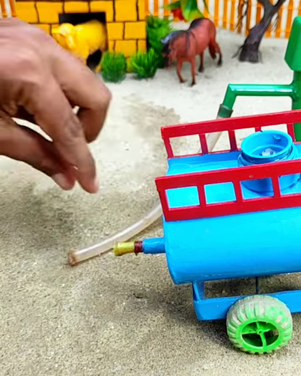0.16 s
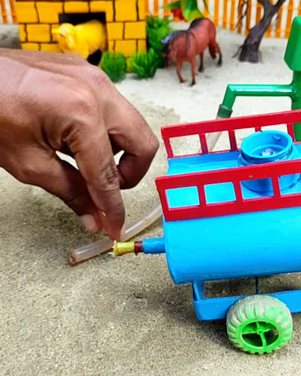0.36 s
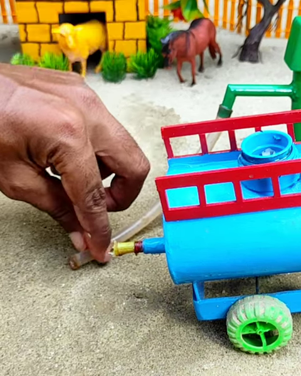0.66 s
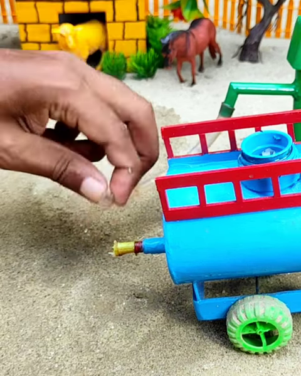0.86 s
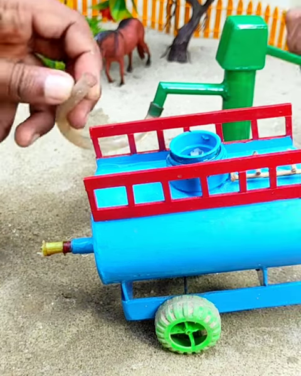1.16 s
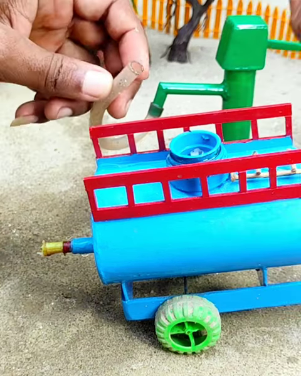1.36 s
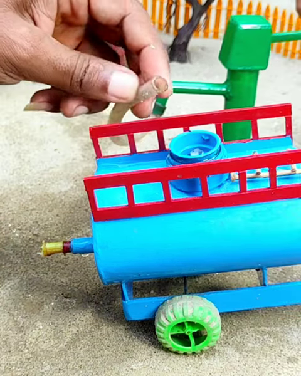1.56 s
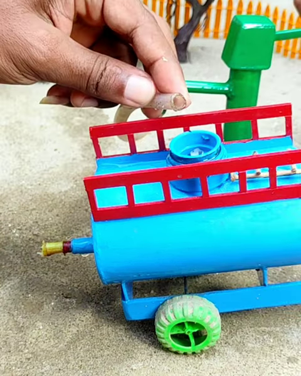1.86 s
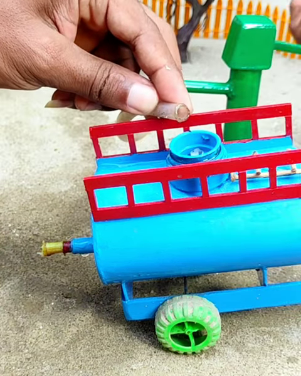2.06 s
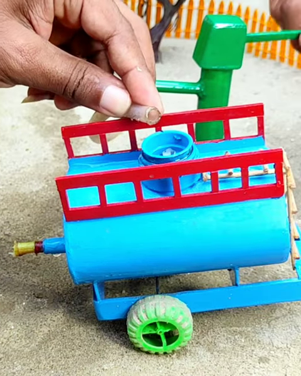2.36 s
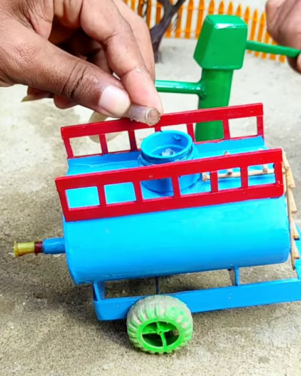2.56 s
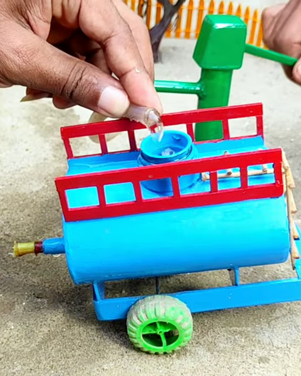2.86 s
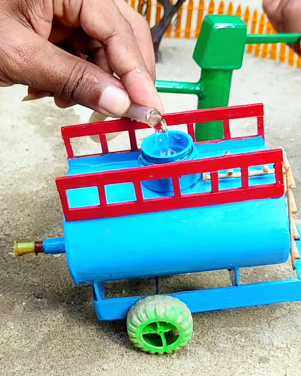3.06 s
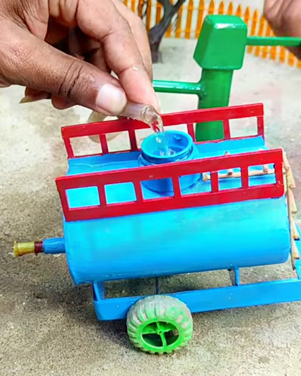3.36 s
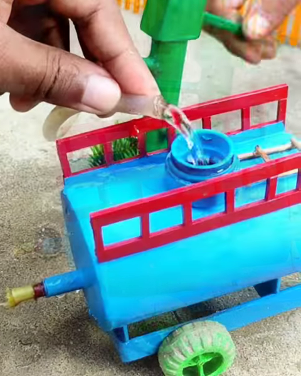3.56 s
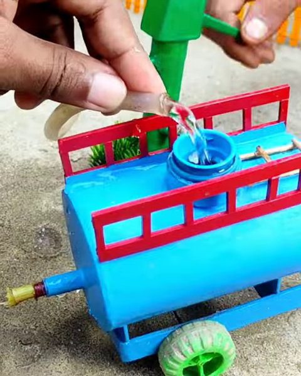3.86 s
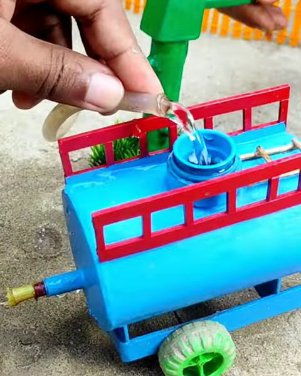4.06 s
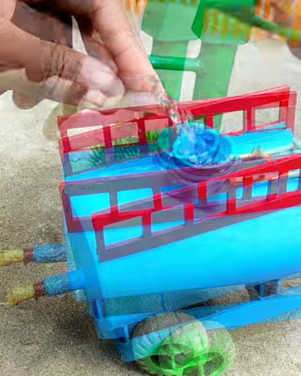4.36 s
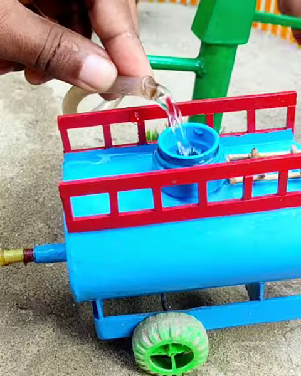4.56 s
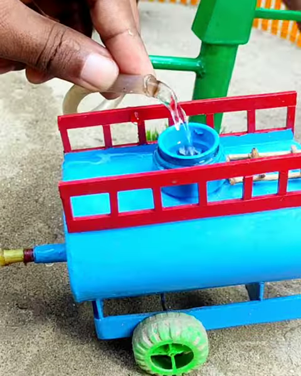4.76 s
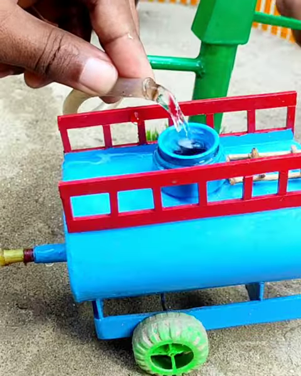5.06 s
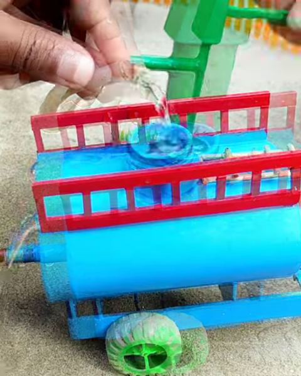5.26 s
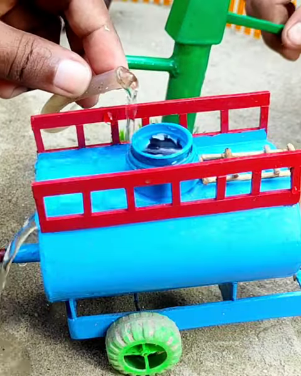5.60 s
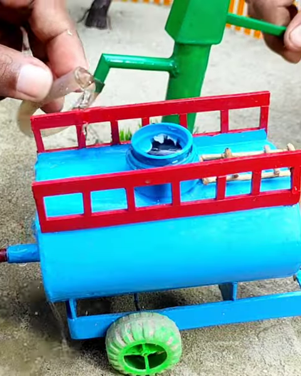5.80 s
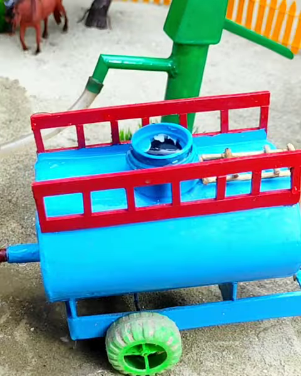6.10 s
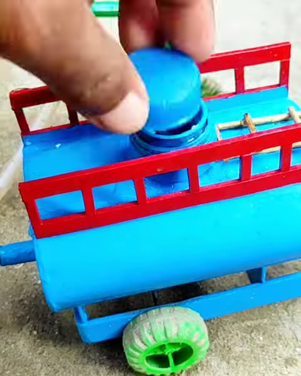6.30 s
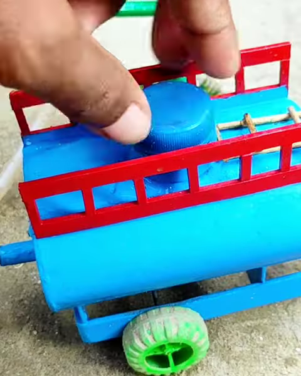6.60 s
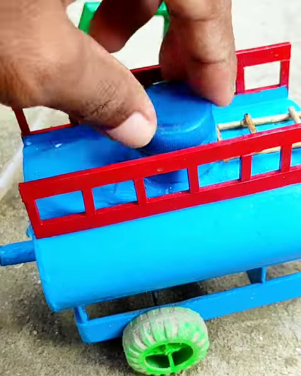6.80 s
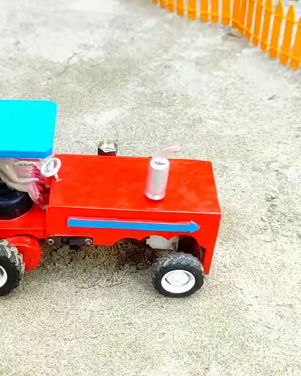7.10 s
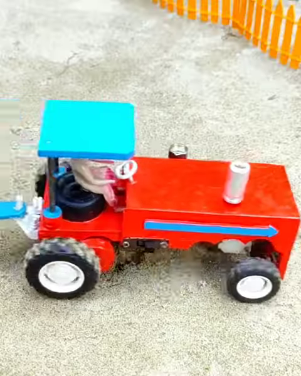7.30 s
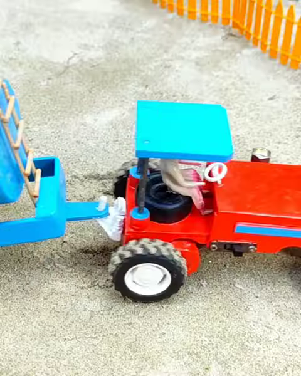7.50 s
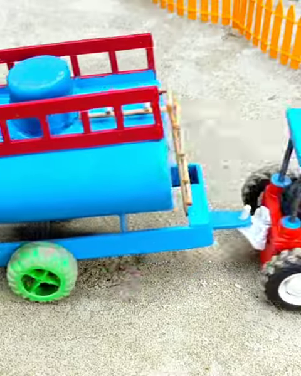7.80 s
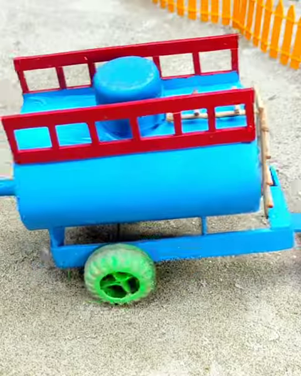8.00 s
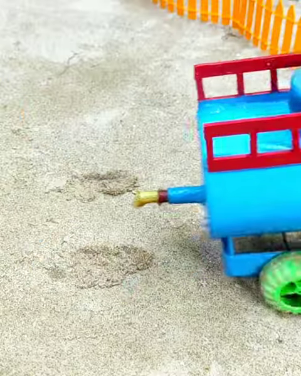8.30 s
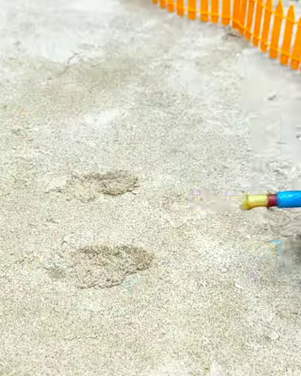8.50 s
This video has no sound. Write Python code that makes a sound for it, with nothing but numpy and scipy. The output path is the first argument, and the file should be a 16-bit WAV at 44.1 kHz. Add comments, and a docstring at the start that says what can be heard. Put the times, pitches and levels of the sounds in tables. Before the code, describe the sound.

Outdoors, close to the microphone, a small hand pump is worked with rasping double catches and a hollow, singing barrel. Then water runs into a plastic tank with bubbling, plops and ticking drops. The flow stops, a plastic cap scrapes and clicks onto its thread, and a tractor motor cuts in, throbbing and rattling to the end. Songbirds whistle from the trees over faint hiss.

```python
"""Outdoors among trees, a small hand pump is worked: the plunger rasps and its barrel resonances ring hollow.
Water then runs into a plastic tank, built from gliding bubble tones, drop ticks, spray noise and a low drumming.
A cap scrapes and clicks on its thread, then a tractor motor comes in: a harmonic throb under gated rattle.
Songbirds whistle throughout as gliding pure tones with diffuse echoes, over a faint outdoor hiss."""
import sys
import numpy as np
from scipy import signal
from scipy.fft import rfft, irfft
from scipy.io import wavfile
from scipy.ndimage import uniform_filter1d

SR = 44100
rng = np.random.default_rng(int(sys.argv[2]) if len(sys.argv) > 2 else 0)


def master(y):
    """Save y as 16-bit WAV."""
    cut = np.clip(np.atleast_2d(y).T, -1, 1)
    pcm = np.round(cut * 32767)  # scale
    wavfile.write(sys.argv[1], SR, pcm.astype(np.int16))


N = 381465
TIME = np.arange(N) / SR


def undb(db):
    """Decibels to gain."""
    return 10 ** (np.asarray(db) / 20)


def unit(x):
    """Scale to rms 1."""
    return x / np.sqrt(np.mean(x ** 2) + 1e-18)


def curve(table, axis=1):
    """One column of a table, joined by straight lines in time."""
    rows = np.array(table)
    return np.interp(TIME, rows[:, 0], rows[:, axis])


def noise():
    """White noise."""
    return rng.standard_normal(N)


def walk(rate, size=N):
    """Smooth chance around zero with a spread near 1, given a new target `rate` times a second."""
    targets = rng.standard_normal(size // 40)
    return 1.5 * np.interp(TIME[:size] * rate, np.arange(size // 40), targets)


def add(track, s, sound):
    """Mix a short sound into a track at time s."""
    i = int(np.clip(s * SR, 0, N - 1))
    track[i:i + len(sound)] += sound[:N - i]


def colour(x, points, size=4096):
    """Minimum-phase filter through (frequency [Hz], level [dB]) points, scaled to rms 1."""
    hz, db = np.transpose(points)
    log_bins = np.log(np.fft.rfftfreq(size, 1 / SR) + 1)
    log_gain = np.log(undb(np.interp(log_bins, np.log(hz), db)))
    cepstrum = irfft(log_gain)[:size // 2]
    cepstrum[1:] *= 2  # folding the cepstrum makes the filter causal
    impulse = irfft(np.exp(rfft(cepstrum, size)))
    return unit(signal.fftconvolve(x, impulse)[:N])


def ring(x, modes, order=1):
    """Resonances (Hz, width Hz, dB) driven by x; a higher order gives steeper skirts."""
    out = 0
    for hz, width, db in modes:
        peak = np.concatenate(signal.iirpeak(hz, hz / width, fs=SR))
        out = out + undb(db) * signal.sosfilt([peak] * order, x)
    return out


def grit(rate, spread_db):
    """Random tiny impacts of very unequal size, about `rate` a second, scaled to rms 1."""
    hits = rng.random(N) < rate / SR
    return unit(hits * noise() * undb(spread_db * np.minimum(rng.exponential(size=N), 4)))


def swells(table):
    """Bell-shaped pushes centred on each row's time: (s, length s, dB)."""
    power = sum(undb(2 * db) / (1 + ((TIME - s) * 2 / length) ** 2) ** 3 for s, length, db in table)
    return np.sqrt(power)


def stereo(mid, side):
    """Left and right from mid and side."""
    return np.array([mid + side, mid - side])


def echoes(x, t60, gap):
    """Diffuse reflections, different in each ear: noise tails of unit energy that build up and die away."""
    t = np.arange(SR) / SR
    tail = rng.standard_normal((2, SR)) * undb(-60 * t / t60) * (1 - np.exp(-t / gap))
    tail /= np.sqrt(np.sum(tail ** 2, axis=1, keepdims=True))
    return signal.fftconvolve(x[None], tail, axes=1)[:, :N]


HOOK_CYCLES = 0.92  # a bubble settles from its sharp start over about this many cycles


def bubble(hz, t60, rise, cycles, hook=0):
    """A pocket of air swells for a few cycles, drops by hook octaves onto its pitch and rings out, gliding."""
    t = np.arange(int(t60 * SR) + 2) / SR
    shape = (1 - np.exp(-t * hz / max(cycles, .05))) ** 2 * undb(-60 * t / t60)
    octaves = rise * t / t60 + hook * np.exp(-t * hz / HOOK_CYCLES)
    return shape / shape.max() * np.sin(2 * np.pi * np.cumsum(hz * 2 ** octaves) / SR)


def ticks(table, t60, crack_t60, crack_hz):
    """Sharp contacts: a short noise crack plus a brief decaying tone, scaled to the row's peak."""
    out, t = np.zeros(N), np.arange(SR // 20) / SR
    for s, db, hz, crack in table:
        snap = rng.standard_normal(len(t)) * undb(-60 * t / crack_t60)
        burst = ring(snap, [(crack_hz, crack_hz, 0)])
        tick = np.sin(2 * np.pi * hz * t) * undb(-60 * t / t60) + crack * burst
        add(out, s, undb(db) * tick / np.abs(tick).max())
    return out


def progress(length):
    """0 to 1 over a note of `length` seconds."""
    return np.linspace(0, 1, int(length * SR))


def whistle(hz, db):
    """A pure note that swells and fades along a pitch contour."""
    arch = np.abs(np.sin(np.linspace(0, np.pi, len(hz)))) ** .5
    return undb(db) * arch * np.sin(2 * np.pi * np.cumsum(hz) / SR)


# tint of the outdoor hiss: (frequency [Hz], level [dB])
AIR_TINT = [(50, -32), (180, -12), (300, 2.5), (700, -0.5), (1600, -20.5), (4000, 14), (6500, 9),
            (9000, -14), (15000, -13)]


def air():
    """Faint outdoor hiss: wide filtered noise whose level drifts slowly."""
    hiss = stereo(colour(noise(), AIR_TINT), 1.24 * colour(noise(), AIR_TINT))
    return hiss * undb(-50.5 + walk(0.05))


# pump strokes, each catching twice: (time [s], barrel level [dB], first rasp level [dB],
# delay of second rasp [s], second rasp level [dB], stutter level [dB])
STROKES = [(0, -26, -33.5, 0.083, -60, -71), (0.321, -22.5, -21.5, 0.071, -26.5, -31.5),
           (1.012, -21.5, -21, 0.068, -23, -34.5), (1.678, -23.5, -26, 0.075, -27, -37),
           (2.395, -36.5, -33, 0.063, -35, -65), (3.099, -35, -32, 0.083, -31, -37.5)]
# plunger sliding back: (centre time [s], length [s], level [dB])
RETURNS = [(.03, 0.31, -13), (.68, 0.23, -15.5), (1.39, 0.06, -18), (1.5, 0.1, -17.5), (2.12, 0.12, -19.5),
           (2.87, 0.12, -35.5)]
# plunger squeaks: (time [s], length [s], pitch [Hz], level [dB])
SQUEAKS = [(0.468, 0.027, 2080, -26.5)]
# plunger clacks as it catches: (time [s], peak level [dB], ring pitch [Hz], crack against ring [ratio])
CLACKS = [(1.667, -5, 2070, 2.9)]
# hollow barrel resonances: (frequency [Hz], width [Hz], level [dB])
BARREL_MODES = [(203.8, 55, 4), (401.5, 37, -5), (517, 93, -5.5), (653, 63, -10.5), (801, 65, 3),
                (926, 91, -7.5), (1132, 110, -7), (2006, 140, -22)]
# bright ringing of the plunger rod: (frequency [Hz], width [Hz], level [dB])
ROD_MODES = [(2097, 23, 1), (3250, 48, -3), (7490, 62, 1.5), (8080, 190, -2)]
# tint of the catching rasps: (frequency [Hz], level [dB])
RASP_TINT = [(240, -42), (400, -5.5), (653, -20.5), (821, 2), (987, -5), (1610, -11), (1740, -14),
             (2590, -13.5), (5000, -21), (7670, -6.5), (11800, -26.5), (12700, -42), (15500, -33)]
# tint of the sliding plunger: (frequency [Hz], level [dB])
SLIDE_TINT = [(760, -51), (1300, 7), (3520, -0.5), (5800, 0.5), (7980, 5), (12900, -14), (15500, -10)]
# low rumble, also heard in the hum, the tank and the grip: (frequency [Hz], level [dB])
RUMBLE_TINT = [(20, 1.5), (70, 0), (180, -11), (450, -17), (1200, -36)]
RASP_S, SECOND_RASP_S, STUTTER_S, STUTTER_FADE_DB = 0.034, 0.038, 0.1065, 10
PUSH_ATTACK_S, PUSH_HOLD_S, PUSH_FADE_DB_PER_S = 0.039, 0.089, 22
SING_HZ, SING_WANDER = 828, 0.0126  # wander as a share of the pitch
THUD_S, THUD_HZ, THUD_T60_S, THUD_DB = 0.1, 193, 0.054, -12  # the plunger bottoms out


def pump():
    """The plunger catches twice, stutters and rubs the barrel into a hollow ring; it sings on the way back."""
    rub, rasps = np.zeros(N), []
    for s, barrel_db, first_db, gap, second_db, stutter_db in STROKES:
        age = TIME - s
        fade_db = PUSH_FADE_DB_PER_S * np.maximum(age - PUSH_HOLD_S, 0)
        rub += np.clip(1 + age / PUSH_ATTACK_S, 0, 1) * undb(barrel_db - fade_db)
        rasps += [(s, RASP_S, first_db), (s + gap, SECOND_RASP_S, second_db)]
        for k in range(2):
            rasps.append((s + gap + (k + 1) * STUTTER_S, SECOND_RASP_S, stutter_db - k * STUTTER_FADE_DB))
    back = swells(RETURNS)
    rub = np.hypot(rub, back * undb(-16.5))

    barrel = ring(noise(), BARREL_MODES, order=2)
    barrel /= np.sqrt(uniform_filter1d(barrel ** 2, size=3000) + 1e-12)  # steady rubbing keeps the ring even
    sing_hz = SING_HZ * (1 + SING_WANDER * walk(55))
    sing = np.sin(2 * np.pi * np.cumsum(sing_hz) / SR) * back * undb(-4.5 + 2.8 * walk(39.5))

    slide = colour(noise() * undb(3.2 * walk(70)), SLIDE_TINT) * rub ** 0.59 * undb(-21.5)
    for s, length, hz, db in SQUEAKS:
        add(slide, s, whistle(hz * (1 + 0.016 * walk(480, size=int(length * SR))), db))
    rasp = colour(noise() * undb(walk(400)), RASP_TINT) * swells(rasps) * undb(6.5)
    scrape = slide + rasp + ticks(CLACKS, t60=0.016, crack_t60=0.041, crack_hz=6940)

    shake = colour(noise(), RUMBLE_TINT) * rub * undb(-30.5)
    add(shake, THUD_S, undb(THUD_DB) * bubble(THUD_HZ, THUD_T60_S, 0, cycles=5.0))
    return barrel * rub + sing + undb(-0.5) * scrape + ring(scrape, ROD_MODES) + shake


# falling slurs, alone and in runs: (time [s], length [s], first pitch [Hz], level [dB])
SLURS = [(0, 0.065, 4110, -32.5), (0.479, 0.059, 3970, -31.5), (2.909, 0.022, 3840, -29.5),
         (2.951, 0.032, 3960, -29), (3.029, 0.029, 4010, -28), (3.083, 0.024, 3980, -30.5),
         (3.138, 0.031, 4180, -30.5), (3.201, 0.034, 4110, -31), (3.259, 0.03, 4120, -30.5),
         (3.323, 0.044, 4260, -28.5), (3.39, 0.027, 4150, -32.5), (3.493, 0.065, 4590, -27),
         (5.665, 0.048, 4700, -29), (5.738, 0.039, 4530, -34), (5.817, 0.039, 4440, -29),
         (6.232, 0.04, 4370, -28.5), (6.295, 0.041, 4210, -33), (6.349, 0.042, 4350, -29),
         (6.424, 0.042, 4206, -30), (6.482, 0.042, 3990, -30), (6.555, 0.026, 3900, -30.5),
         (6.6, 0.047, 4070, -29), (6.719, 0.045, 4520, -27.5), (6.767, 0.019, 3664, -29.5)]
SLUR_FALL_HZ_PER_S = 48000


def slurs(voice):
    """Quick falling notes with an unsteady pitch and level."""
    for s, length, first_hz, db in SLURS:
        u = progress(length)
        hz = first_hz - SLUR_FALL_HZ_PER_S * length * u
        unsteady_hz = hz * (1 + 0.021 * walk(400, size=len(u)))
        add(voice, s, whistle(unsteady_hz, db + 1.67 * walk(203, size=len(u))))


# level whistles: (time [s], length [s], pitch [Hz], level [dB])
WHISTLES = [(0.118, 0.03, 4120, -42), (0.438, 0.042, 3950, -30), (0.59, 0.049, 4430, -34.5),
            (0.79, 0.09, 4270, -43), (5.832, 0.018, 3400, -34), (7.01, 0.054, 3630, -49),
            (7.174, 0.065, 4414, -41), (7.733, 0.082, 4330, -39), (8.03, 0.074, 4380, -38.5),
            (8.308, 0.033, 4370, -39)]
WHISTLE_WAVER = 0.0072  # share of the pitch


def level_whistles(voice):
    """Notes that hold one pitch with a slight waver."""
    for s, length, pitch, db in WHISTLES:
        waver = WHISTLE_WAVER * walk(627, size=int(length * SR))
        add(voice, s, whistle(pitch * (1 + waver), db))


# short chips: (time [s], level [dB])
CHIPS = [(0.266, -33), (0.59, -43), (1.132, -44), (1.636, -41), (1.8, -43), (2.042, -47), (2.62, -41),
         (2.685, -41), (5.993, -36)]
CHIP_S, CHIP_FROM_HZ, CHIP_TO_HZ = 0.018, 5200, 4550


def chips(voice):
    """Very short notes, all with the same falling pitch."""
    for s, db in CHIPS:
        add(voice, s, whistle(CHIP_FROM_HZ + (CHIP_TO_HZ - CHIP_FROM_HZ) * progress(CHIP_S), db))


# flourishes that open a trill: (time [s], level [dB])
FLOURISHES = [(2.745, -36.5), (6.051, -33.5)]
# shape of a flourish: (time after its start [s], pitch [Hz], level [dB])
FLOURISH_SHAPE = [(0, 3806, 8.5), (0.019, 4140, 5.5), (.038, 3240, 0.5), (0.051, 2990, -3.5),
                  (.07, 4250, 0), (.1, 4620, -6), (0.133, 4820, -1)]


def flourishes(voice):
    """One continuous note drawn through a zigzag of pitches and levels."""
    at, hz, shape_db = np.transpose(FLOURISH_SHAPE)
    t = progress(at[-1]) * at[-1]
    for s, db in FLOURISHES:
        unsteady_hz = np.interp(t, at, hz) * undb(0.194 * walk(611, size=len(t)))
        add(voice, s, whistle(unsteady_hz, db + np.interp(t, at, shape_db)))


# notes that dive and turn up again: (time [s], length [s], lowest pitch [Hz], last pitch [Hz],
# dive level [dB], climb level [dB])
DIPS = [(4.872, 0.063, 4570, 5690, -29.5, -22.5), (4.967, 0.053, 4540, 5800, -27, -25),
        (5.047, 0.06, 4610, 5940, -26.5, -19.5), (5.136, 0.048, 4520, 5570, -22.5, -18),
        (5.225, 0.067, 3150, 4640, -19, -15.5), (5.333, 0.064, 3124, 4620, -18.5, -18),
        (5.445, 0.078, 2990, 3990, -22.5, -20.5), (5.56, 0.078, 3150, 4580, -25, -23)]
DIP_TOP_HZ, DIP_TURN = 7040, 0.52  # starting pitch; turning point as a share of the note


def dips(close):
    """Notes that plunge from a high start, turn and climb part of the way back."""
    for s, length, low_hz, end_hz, dive_db, climb_db in DIPS:
        u = progress(length)
        dive = np.maximum(1 - u / DIP_TURN, 0)
        climb = np.maximum(u - DIP_TURN, 0) / (1 - DIP_TURN)
        hz = low_hz + (DIP_TOP_HZ - low_hz) * dive ** 1.5 + (end_hz - low_hz) * climb ** 1.303
        db = dive_db - 4 * dive + (climb_db - dive_db) * np.sqrt(climb)
        unsteady_hz = hz * (1 + .015 * walk(500, size=len(u)))
        add(close, s, whistle(unsteady_hz, db + 3.2 * walk(260, size=len(u))))


TREES_PAN_DB = 1.5  # left above the middle


def birds():
    """Songs from the trees on the left and dipping notes from closer by, both feeding the trees' echo."""
    voice, close = np.zeros(N), np.zeros(N)
    slurs(voice)
    level_whistles(voice)
    chips(voice)
    flourishes(voice)
    dips(close)
    scattered = (voice + undb(-4.5) * close) * unit(1 + 0.5 * walk(300))  # moving leaves blur the echo's pitch
    early = undb(5.0) * echoes(scattered, t60=0.27, gap=0.00093)
    late = undb(1.0) * echoes(scattered, t60=0.85, gap=0.019)
    mid, side = early + late
    pan = undb(TREES_PAN_DB * np.array([[1], [-1]]))
    return (1.57 * voice + stereo(mid, 0.54 * side)) * pan + close * np.sqrt(2)


# low hum: (time [s], level [dB])
HUM = [(1.6, -95), (1.64, -32.5), (1.9, -33), (2.73, -41), (2.77, -100)]
# hum partials: (multiple of the base pitch, level [dB])
HUM_ORDERS = [(1, -16), (2, 6.5), (3, -1)]
HUM_HZ = 40.5


def hum():
    """A low, slightly wavering stack of partials over rumble, which comes and goes."""
    phase = 2 * np.pi * np.cumsum(HUM_HZ * (1 + 0.034 * walk(14))) / SR
    tone = np.zeros(N)
    for k, db in HUM_ORDERS:
        tone += undb(db + 2.1 * walk(4.05)) * np.sin(round(k) * phase + rng.uniform(0, 2 * np.pi))
    return (unit(tone) + undb(-2) * colour(noise(), RUMBLE_TINT)) * undb(curve(HUM))


# stream into the tank, shared by the water layers: (time [s], flow level [dB])
FLOW = [(2.91, -70), (3.03, -49), (3.11, -35), (3.36, -29.5), (3.67, -35.5), (4.11, -28), (4.56, -24.5),
        (4.81, -37.5), (5.16, -32), (5.43, -31.5), (5.71, -35.5), (5.83, -33), (5.91, -58)]
FLOW_START_S, FLOW_LENGTH_S = FLOW[0][0], FLOW[-1][0] - FLOW[0][0]
RING_CYCLES = 48  # a large bubble dies away in this many cycles, so big ones ring longer
GURGLE_HZ, GURGLE_OCTAVES = 394, 2.7  # lowest pitch and range above it


def gurgle():
    """Weaker large bubbles, left to chance in time, size and glide."""
    out = np.zeros(N)
    for when, width, strength, glide in rng.random(size=(170, 4)):
        hz = GURGLE_HZ * 2 ** (GURGLE_OCTAVES * width)
        tone = bubble(hz, RING_CYCLES / hz, 1.2 * (glide - .25), cycles=3 * glide)
        add(out, FLOW_START_S + FLOW_LENGTH_S * when, undb(10 * strength + 6.9 * width) * tone)
    return out


SMALL_HZ, SMALL_OCTAVES, SMALL_CYCLES = 2020, 1, 46  # middle pitch, its spread, middle length of the ring


def small_bubbles():
    """A swarm of small ringing bubbles scattered between the ears."""
    out = np.zeros((2, N))
    chances, widths = rng.random(size=(1300, 5)), rng.standard_normal(size=1300)
    for (when, strength, life, glide, place), width in zip(chances, widths):
        hz = min(SMALL_HZ * 2 ** (SMALL_OCTAVES * width), SR / 4)
        tone = bubble(hz, SMALL_CYCLES * (.5 + life) / hz, 0.87 * (glide - .35), cycles=0.5)
        grain = undb(20 * strength ** 3 - 0.5 * width ** 2) * tone
        for ear, share in enumerate([.3 + place, 1.3 - place]):
            add(out[ear], FLOW_START_S + FLOW_LENGTH_S * when, grain * share)
    return out


# plops, large bubbles that pinch off at once: (time [s], peak level [dB], pitch [Hz])
PLOPS = [(3.198, -22, 800), (3.268, -11.5, 903), (3.33, -9, 722), (3.46, -14.5, 1100), (3.62, -19.5, 756),
         (3.742, -19, 732), (3.811, -11, 1160), (4.214, -13, 1490), (4.326, -15, 1260), (4.612, -7.5, 2390),
         (4.686, -14, 946), (4.813, -14, 1235), (4.938, -12, 1180), (5.107, -12.5, 1110),
         (5.122, -9.5, 2460), (5.418, -13, 1420), (5.422, -7.5, 2360), (5.647, -12, 1015),
         (5.68, -14.5, 990), (5.718, -15.5, 1050), (5.747, -15, 1720), (5.792, -9.5, 706)]
# glugs, swelling bubbles: (time [s], length [s], first pitch [Hz], peak level [dB], rise [octaves])
GLUGS = [(3.118, 0.026, 906, -21.5, 0.19), (3.754, 0.017, 643, -16.5, .3),
         (3.878, 0.034, 1000, -20.5, 0.66), (4.04, 0.032, 1033, -20.5, 0.23),
         (4.077, 0.051, 535, -24, 0.25), (4.42, 0.021, 778, -15.5, -0.093), (4.602, 0.034, 582, -18, 0.33),
         (4.739, 0.031, 835, -18.5, 0.3), (5.144, 0.021, 633, -22.5, 0.34)]
GLUG_FADE_DB = 2.5
PLOP_SWELL_CYCLES, PLOP_GLIDE_OCTAVES, HOOK_OCTAVES = 0.23, -0.14, 0.86  # plops start sharp by the hook


def plops_and_glugs():
    """Plops pinch off sharp and settle on their pitch; glugs swell and mostly rise toward the surface."""
    out = np.zeros(N)
    for s, db, hz in PLOPS:
        tone = bubble(hz, RING_CYCLES / hz, PLOP_GLIDE_OCTAVES, PLOP_SWELL_CYCLES, HOOK_OCTAVES)
        add(out, s, undb(db) * tone)
    for s, duration, hz, db, rise in GLUGS:
        u = progress(duration)
        add(out, s, whistle(hz * 2 ** (rise * u), db - GLUG_FADE_DB * u))
    return out


# stream drumming on the tank: (time [s], level [dB])
DRUM = [(2.95, -57), (3.15, -34), (3.7, -32.5), (5.2, -32), (5.82, -33), (5.92, -69)]
# drops striking the plastic: (time [s], peak level [dB], ring pitch [Hz], crack against ring [ratio])
DROPS = [(3.4547, -6.5, 2640, 0.82), (3.7647, -14, 2910, 0.36), (3.8274, -4.5, 3630, 1),
         (3.8745, -8.5, 1960, 0.67), (3.9175, -6.5, 2920, 0.19), (3.9458, -5.5, 2650, 0.99),
         (3.992, -14, 3070, 0.16), (4.237, -4, 3050, 0.61), (4.5942, 0, 2030, 0.84)]
# tint of the spray: (frequency [Hz], level [dB])
SPRAY_TINT = [(160, -42), (260, -45), (350, -21), (760, -13.5), (3000, -15), (4100, -17.5), (15400, -36)]
# tint of the spattering tiny drops: (frequency [Hz], level [dB])
SPATTER_TINT = [(1000, -43), (3000, -47), (6500, 10), (9000, 5), (15500, -13)]
SMALL_DB, GURGLE_DB, SPRAY_DB, SPATTER_DB = -3, -7.5, -6, -15
GULP_DB, SPRAY_FLICKER_DB, SPATTER_SPREAD_DB = 2.5, 4, 6.9


def water():
    """The stream traps bubbles large and small, throws drops at the plastic and drums on the tank."""
    flow = undb(curve(FLOW))
    gulps = undb(GULP_DB * walk(28))  # the stream breaks into uneven slugs
    fizz = unit(small_bubbles() * gulps) * undb(SMALL_DB)
    bubbling = (fizz + unit(gurgle()) * undb(GURGLE_DB)) * flow

    spray = stereo(colour(grit(4000, 1.2), SPRAY_TINT), 0.28 * colour(noise(), SPRAY_TINT))
    spray = spray * flow * gulps * undb(SPRAY_DB + SPRAY_FLICKER_DB * walk(110))
    force = np.minimum(flow / undb(-32), 1) ** 2  # a weak stream spatters far less
    spatter = np.array([colour(grit(27, SPATTER_SPREAD_DB), SPATTER_TINT) for ear in range(2)])
    spatter = spatter * flow * force * undb(SPATTER_DB)
    drum = stereo(colour(noise(), RUMBLE_TINT), 0.57 * colour(noise(), RUMBLE_TINT))
    drum = drum * undb(curve(DRUM) - 2.5 + 2.0 * walk(16))

    near = plops_and_glugs() + ticks(DROPS, t60=0.015, crack_t60=0.011, crack_hz=5500)
    reflected = undb(-11.0) * echoes(near + bubbling.mean(axis=0), t60=0.11, gap=0.0054)
    wet = near + bubbling + spray + spatter + drum + reflected
    return wet * undb(np.array([[-.6], [.6]]))  # slightly right


# last push of the fingers: (centre time [s], length [s], level [dB])
LAST_TWIST = [(6.93, 0.025, -29)]
# cap clicks: (time [s], peak level [dB], ring pitch [Hz], crack against ring [ratio])
CAP_CLICKS = [(6.485, -33, 1200, 0.42), (6.4995, -25, 1540, 0.34), (6.69, -26, 2190, 0.42),
              (6.808, -13.5, 4550, 0.92), (6.845, -9, 5700, 1), (6.952, -16, 6000, 0.41),
              (7.097, -26, 4350, 0.43)]
# cap thread scrapes: (centre time [s], length [s], scrape level [dB], hiss level [dB])
SCRAPES = [(6.546, 0.059, -33.5, -36), (6.638, 0.044, -33, -58), (6.727, 0.056, -37, -37),
           (6.785, 0.055, -38, -44), (6.827, 0.041, -27.5, -30), (6.906, 0.04, -24, -38)]
# tint of the scrapes: (frequency [Hz], level [dB])
SCRAPE_TINT = [(180, -34), (300, -11.5), (1150, -13), (2640, -5.5), (4660, -5), (6500, -7), (8000, -13),
               (13800, -37), (14500, -48)]
# tint of the thread hiss: (frequency [Hz], level [dB])
THREAD_HISS_TINT = [(1500, -31), (4000, 1), (6000, 0), (9000, -3), (11500, -7), (13800, -3), (14700, -34.5)]
GRIP_FROM_S, GRIP_TO_S, GRIP_DB = 6.47, 6.98, -42  # the tank rumbles under the fingers


def cap():
    """The cap scrapes and hisses along its thread and clicks home while the fingers jostle the tank."""
    held = uniform_filter1d(1. * ((TIME > GRIP_FROM_S) & (TIME < GRIP_TO_S)), size=1500)
    grip = colour(noise(), RUMBLE_TINT) * (held * undb(GRIP_DB) + swells(LAST_TWIST))
    scrape = stereo(colour(grit(5000, 0.78), SCRAPE_TINT), 0.11 * colour(noise(), SCRAPE_TINT))
    scrape = scrape * swells([(s, length, db) for s, length, db, _ in SCRAPES])
    hiss = colour(noise(), THREAD_HISS_TINT) * swells([(s, length, db) for s, length, _, db in SCRAPES])
    return scrape + hiss + grip + ticks(CAP_CLICKS, t60=0.0053, crack_t60=0.013, crack_hz=6800)


# tractor motor: (time [s], firing rate [Hz], rattle level [dB], throb level [dB])
MOTOR = [(7.14, 27.92, -59, -70), (7.17, 28, -33, -49), (7.24, 29.58, -23.5, -27),
         (7.32, 32.04, -18.5, -29.5), (7.52, 35.78, -15, -20), (7.6, 39.99, -20, -41),
         (7.86, 34.43, -17.5, -23), (8.06, 35, -15.5, -19), (8.3, 34.15, -16, -26.5),
         (8.6, 32.37, -16, -24.5)]
# throb partials: (multiple of the firing rate, level [dB])
THROB_ORDERS = [(1, -33), (2, -8.5), (3, 1), (4, -10.5), (5, -13), (6, -8)]
# tint of the motor's roar: (frequency [Hz], level [dB])
MOTOR_TINT = [(18, -42), (30, -16), (70, -6.5), (134, -7), (198, -3), (250, -6.5), (369, -3.5), (480, -10),
              (650, -8), (822, -13.5), (1060, -12), (1880, -18.5), (2200, -17), (3150, -20.5),
              (6340, -25.5), (13500, -44.5), (14800, -67)]
# knocks of loose parts: (time [s], level [dB])
KNOCKS = [(7.234, -18.5), (7.3505, -18), (7.391, -16), (7.431, -16), (7.981, -17), (8.073, -18.5),
          (8.144, -20), (8.181, -15), (8.33, -17), (8.411, -19), (8.492, -14.5), (8.54, -15.5)]
# thuds of the casing: (frequency [Hz], width [Hz], level [dB])
CASING_MODES = [(340, 320, 10), (616, 57, 10.5), (1104, 340, 13.5)]
# clinks of the loose parts: (frequency [Hz], width [Hz], level [dB])
CLINK_MODES = [(2235, 380, 12.5), (3650, 520, -3), (4200, 3800, 1.5), (5130, 270, -2.5), (6100, 150, -11)]
CLATTER_DB = -14  # weaker knocks, one on each firing
KNOCK_T60_S, CLINK_T60_S, KNOCK_THUD_DB = 0.045, 0.04, 1  # last: the thud of a knock against its clink
SPREAD_HZ = 770  # above this the rattle differs between left and right


def tractor():
    """Lumpy firings throb under a rattle gated by each cycle; loose parts thud and clink on the casing."""
    turns = np.cumsum(curve(MOTOR) * (1 + 0.014 * walk(25))) / SR  # firing cycles so far
    running = TIME > MOTOR[0][0]
    power = undb(curve(MOTOR, axis=2)) * running
    throb = np.zeros(N)
    for k, db in THROB_ORDERS:
        throb += undb(db + 2 * walk(14)) * np.sin(2 * np.pi * (round(k) * turns + rng.random()))

    gate = (.6 + np.exp(-(turns % 1) / .22)) * undb(1.6 * walk(300))
    strike = np.exp(-(turns % 1) / .16)
    thuds = undb(CLATTER_DB) * strike * power * undb(-3.5)
    clinks = thuds.copy()
    t = np.arange(SR // 20) / SR
    for s, db in KNOCKS:
        add(thuds, s, undb(db + KNOCK_THUD_DB - 60 * t / KNOCK_T60_S))
        add(clinks, s, undb(db - 60 * t / CLINK_T60_S))

    def rattle():
        """Gated roar of the motor and the ring of the blows on its casing."""
        blows = ring(thuds * rng.choice([-1, 1], N), CASING_MODES, order=2)
        blows = blows + ring(clinks * rng.choice([-1, 1], N), CLINK_MODES, order=2)
        roar = colour(grit(5000, 1.4) * gate, MOTOR_TINT)
        return power * undb(-2.5) * roar + undb(5.5) * blows

    treble = signal.butter(2, SPREAD_HZ, "high", fs=SR, output="sos")
    bass = signal.butter(1, SPREAD_HZ, fs=SR, output="sos")
    shared = rattle()
    near = running * undb(curve(MOTOR, axis=3)) * unit(throb)
    near = near + 0.5 * shared + .5 * signal.sosfilt(bass, shared)
    apart = np.array([signal.sosfilt(treble, rattle()) for ear in range(2)]) * undb(-2.5)
    # the sound reaches the left side about half a millisecond late
    direct = np.array([np.roll(near, SR // 2200), near * undb(-1.0)])
    return direct + undb(-6.0) * echoes(near, t60=0.09, gap=0.0062) + apart


def scene():
    """All sources together."""
    return air() + pump() + birds() + hum() + water() + cap() + tractor()


TOP_HZ = 15500


def record(dry):
    """A steep low-pass removes everything above TOP_HZ."""
    return signal.sosfilt(signal.ellip(8, .2, 70, TOP_HZ, fs=SR, output="sos"), dry)


dry = scene()
out = record(dry)
master(out)
```